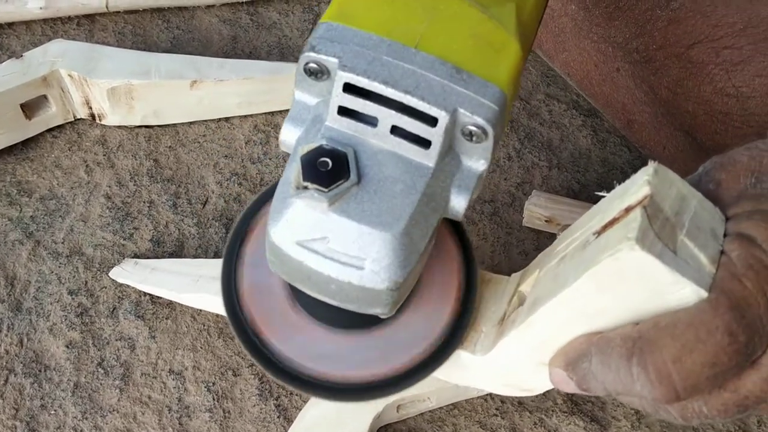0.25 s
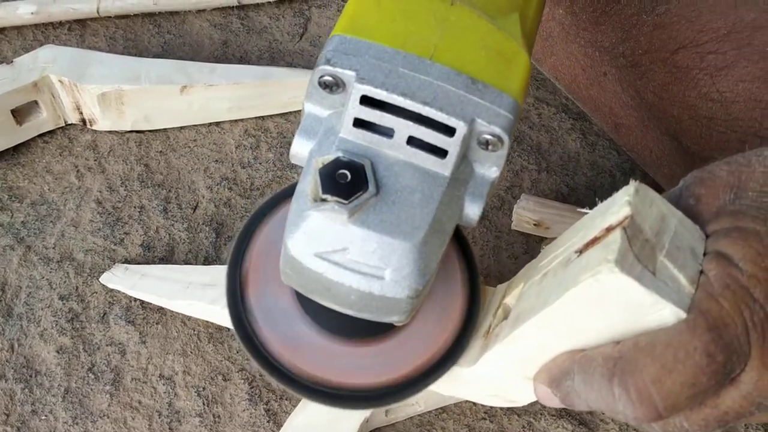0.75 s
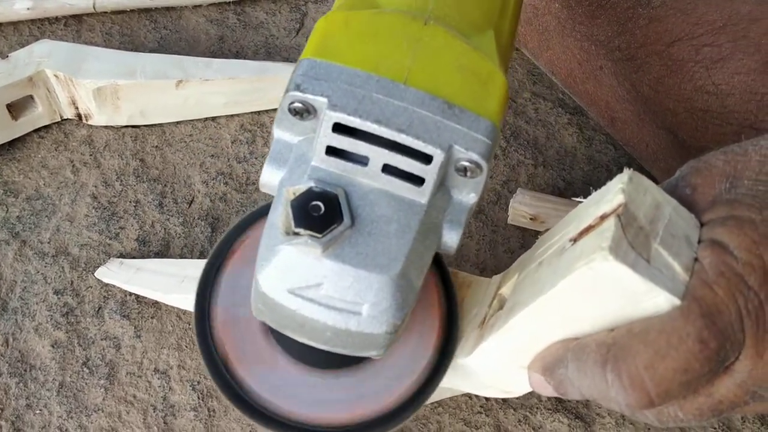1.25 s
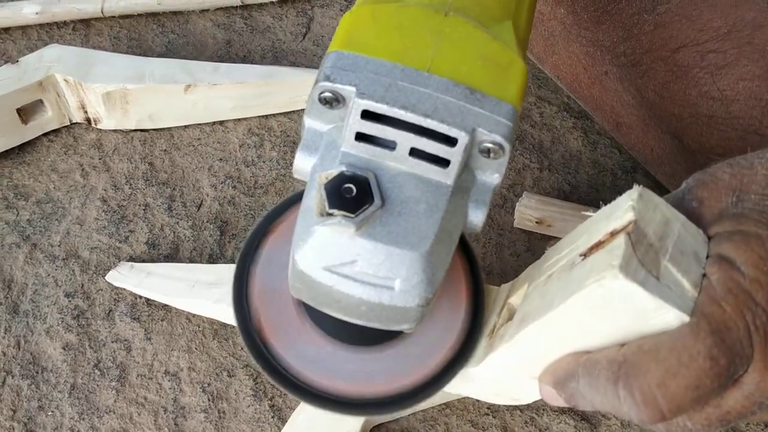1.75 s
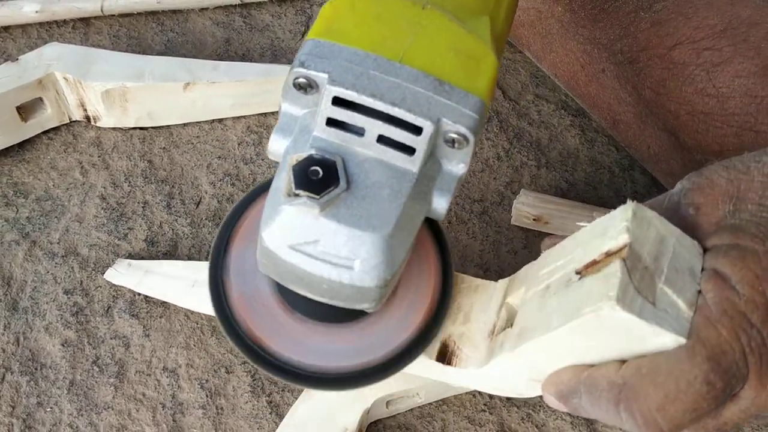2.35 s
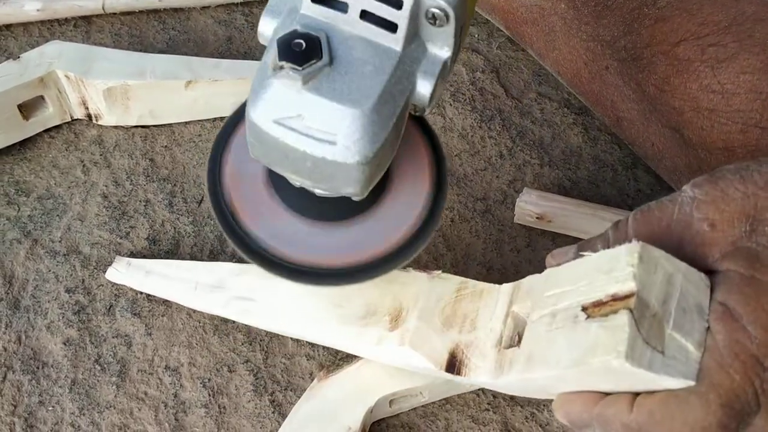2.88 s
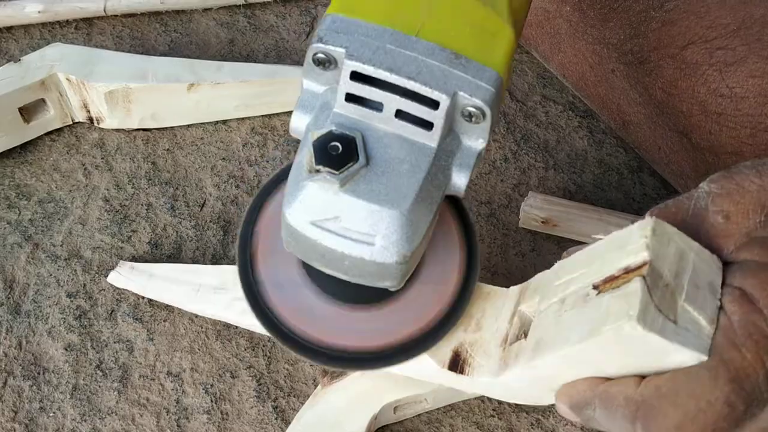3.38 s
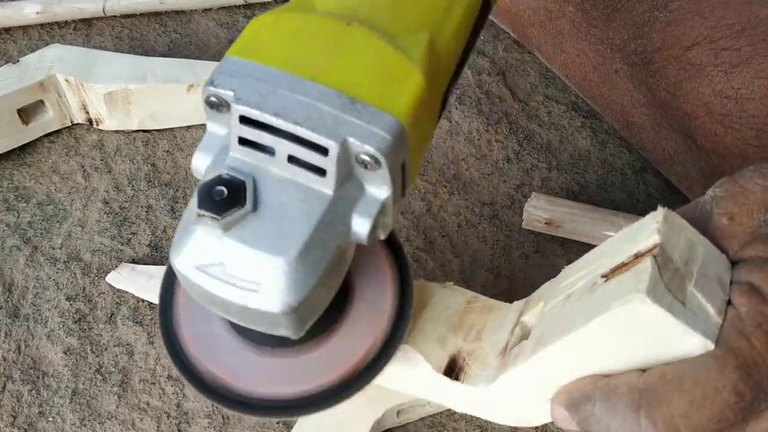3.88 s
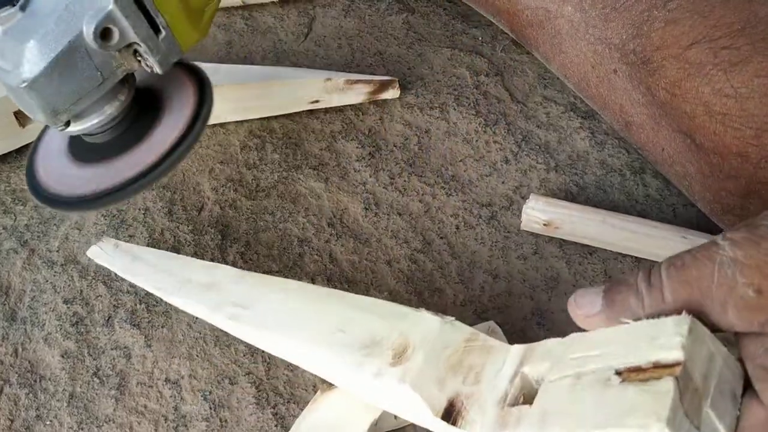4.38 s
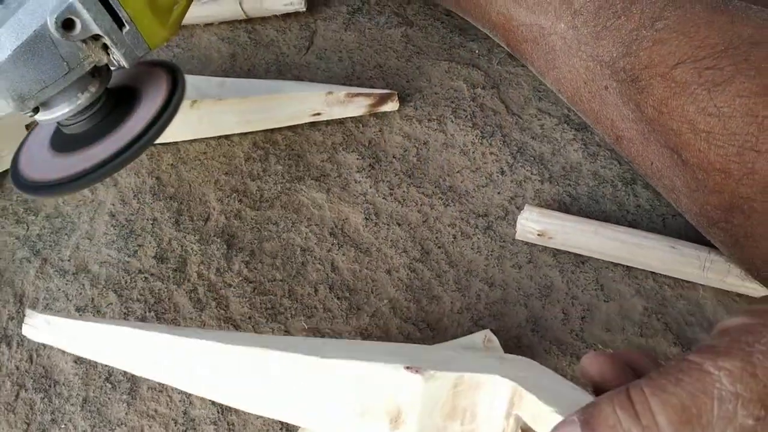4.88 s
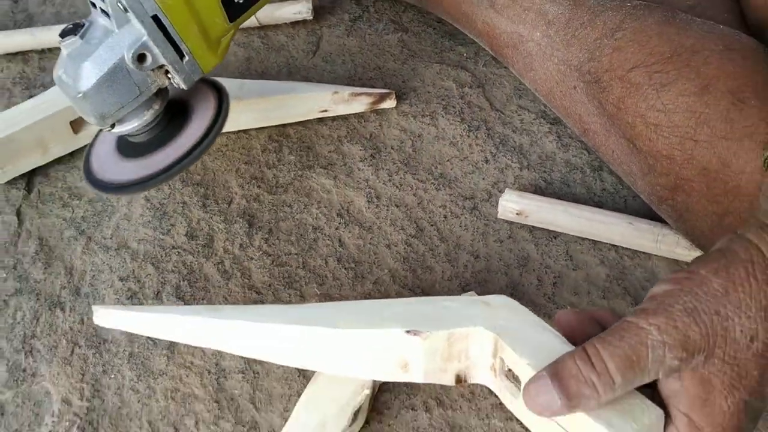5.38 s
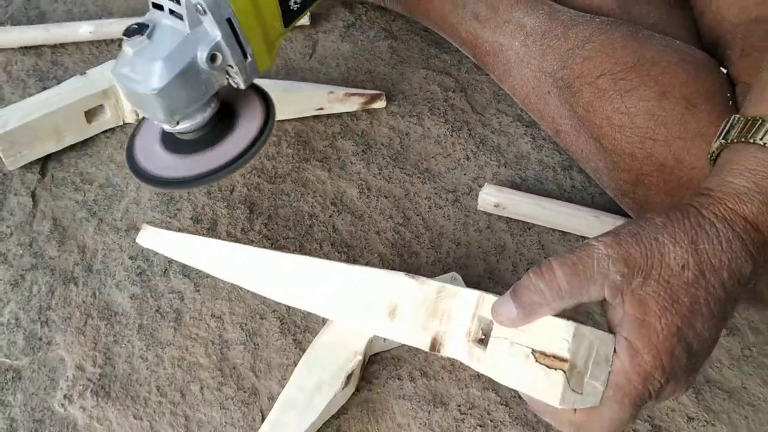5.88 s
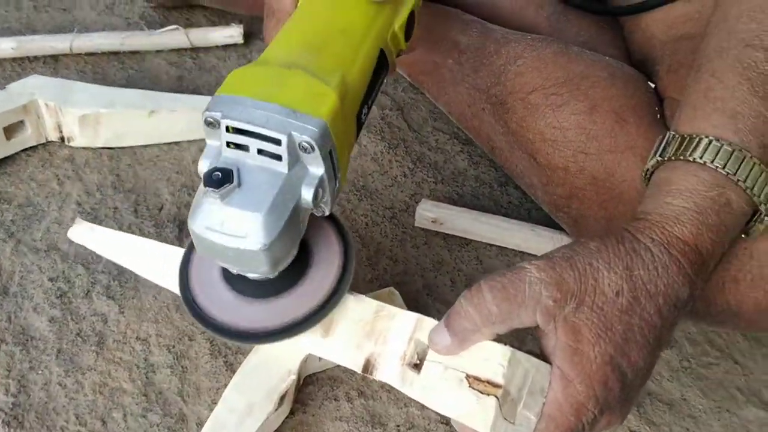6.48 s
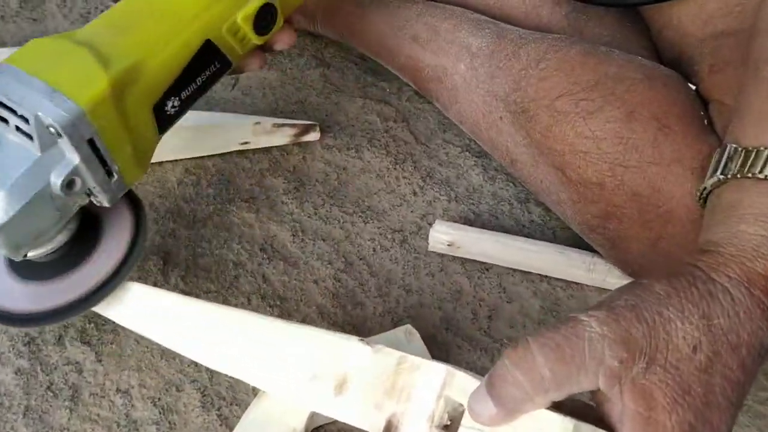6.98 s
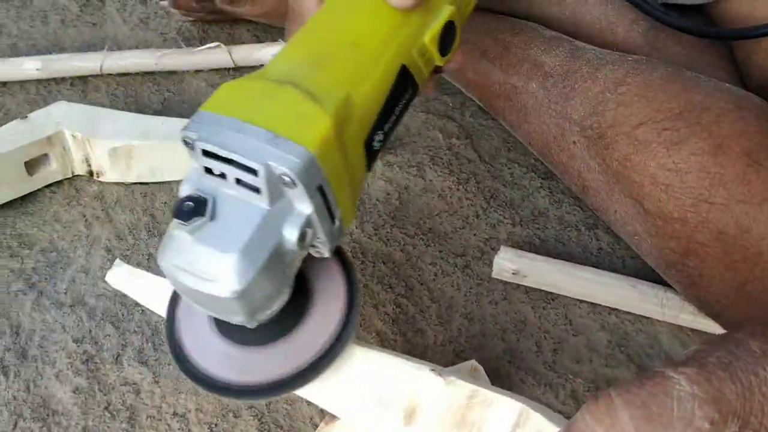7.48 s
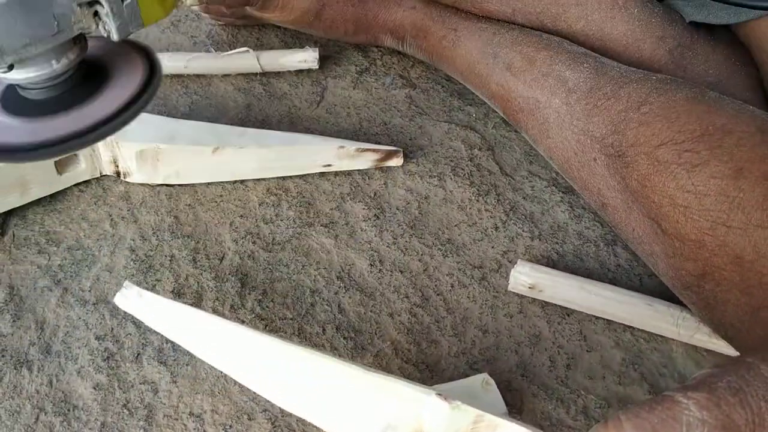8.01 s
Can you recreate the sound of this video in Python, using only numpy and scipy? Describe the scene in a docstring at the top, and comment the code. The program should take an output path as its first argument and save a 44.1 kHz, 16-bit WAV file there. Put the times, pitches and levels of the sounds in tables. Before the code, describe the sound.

Constant harsh fan rush and gear whine from a close power tool. Gritty sanding and squealing fill the first two seconds while the motor labours; release lets the pitch climb. A short scrape follows, then steady free spinning with a couple of sharp ticks, a longer lighter rasp on a slender piece of wood, and free spinning to the end. Faint crackle throughout, close surfaces, no roomy echo.

```python
"""A hand-held angle grinder with a sanding disc smooths a piece of wood, close by.
It starts pressed on the flat: the motor is slowed, the wood shades the fan air, and the grit, coming round
on every turn, makes a bright buzzing rasp with squeals and a few dull bumps. Lifted off, it speeds up,
briefly brushes the flat, runs free with two sharp ticks, works the thin tip, then runs free again.
Throughout, the fan rushes (shaped noise), motor and gears whine (shaft-locked tones) and ticks crackle."""
import sys
import numpy as np
from scipy import signal
from scipy.fft import rfft, irfft
from scipy.io import wavfile
from scipy.ndimage import uniform_filter1d, map_coordinates

SR = 44100
rng = np.random.default_rng(int(sys.argv[2]) if len(sys.argv) > 2 else 0)


def generate_wav(signal):
    """Clip the signal to [-1, 1] and save it as 16-bit WAV at the path in sys.argv[1]."""
    frames = np.transpose(np.atleast_2d(signal))
    scaled = np.clip(frames, -1, 1) * 32767
    pcm = np.round(scaled).astype(np.int16)
    wavfile.write(sys.argv[1], SR, pcm)


N = 363825
TIME = np.arange(N) / SR
BIN_HZ = np.maximum(np.arange(N // 2 + 1) * SR / N, 1)


def from_db(db):
    """Decibels to gain."""
    return np.exp(np.asarray(db) * (np.log(10) / 20))


def rms_one(x):
    """Scale to unit power."""
    return x / np.sqrt(np.mean(x ** 2) + 1e-20)


def in_time(rows):
    """Each column of a curve at every sample."""
    s, *columns = np.transpose(rows)
    return [np.interp(TIME, s, column) for column in columns]


def over_hz(points):
    """A short spectrum at every frequency bin, interpolated over log frequency."""
    hz, value = np.transpose(points)
    return np.interp(np.log(BIN_HZ), np.log(hz), value)


def resonances(peaks):
    """Bell-shaped peaks and hollows, in dB at every frequency bin."""
    return sum(db / (1 + (2 * (BIN_HZ - hz) / width_hz) ** 2) for hz, width_hz, db in peaks)


def above(edge_hz):
    """Gain of a smooth crossover that passes what lies above the edge."""
    return 1 / (1 + (edge_hz / BIN_HZ) ** 40)


def white():
    """The spectrum of a fresh white noise."""
    return rng.standard_normal(len(BIN_HZ)) + 1j * rng.standard_normal(len(BIN_HZ))


def drift(rate_hz):
    """Slow random curve of spread 1, changing about rate_hz times a second."""
    slow = rng.standard_normal(N // 20)   # one point per 20 samples
    hz = np.arange(len(slow) // 2 + 1) * SR / N
    slow = irfft(rfft(slow) / (1 + (hz / rate_hz) ** 2), len(slow))
    return np.interp(np.arange(N) / 20, np.arange(len(slow)), rms_one(slow))


def narrow_noise(turns, width_hz):
    """A rough line: noise of unit power gathered round a moving pitch."""
    envelope = drift(width_hz) + 1j * drift(width_hz)
    return np.real(envelope * np.exp(2j * np.pi * turns))


def panned(x, pan_db):
    """Place a sound, left minus right in dB."""
    return x * from_db(np.array([[.5], [-.5]]) * pan_db)


def delayed(x, ms):
    """Read a sound later by a delay that may change."""
    return np.interp(np.abs(TIME - ms / 1000), TIME, x)


# disc laid on the wood: start_s, end_s (lift begins), lean_in_s, lift_off_s, pressure (0-1), place
STROKES = [(-.08, 2.224, 0.37, 0.11, 0.7, "flat"), (3.27, 3.54, 0.15, 0.071, 0.4, "flat"),
           (6.22, 7.26, 0.23, .22, 0.7, "tip")]


def contact(place):
    """Pressure of the disc on one part of the wood: it leans in, holds and lifts off."""
    pressure = 0
    for start_s, end_s, lean_in_s, lift_off_s, peak, where in STROKES:
        if where == place:
            lean = np.clip((TIME - start_s) / lean_in_s, 0, 1)
            lift = np.clip(1 - (TIME - end_s) / lift_off_s, 0, 1)
            pressure = pressure + peak * lean * lift
    return pressure


FLAT_RASP_DB, TIP_RASP_DB = -15.5, -20   # at pressure 1, before the bites
# colour of the rasp: freq_hz, density_db (per Hz)
RASP_COLOUR = [(150, -24), (700, -32), (1200, -35), (2400, -9.5), (3200, -5.5), (6500, -1), (7600, 0.5),
               (11500, -1), (12600, 0.5), (14000, -5), (15700, -21)]
# ringing of disc and wood, on the flat and at the tip: freq_hz, width_hz, gain_db
FLAT_RING = [(6670, 650, -3.5), (7140, 300, 3), (8160, 1200, 2), (11300, 1500, 4.5), (12450, 400, -3),
             (14000, 400, -9)]
TIP_RING = [(3540, 880, 7.5), (5600, 410, 5.5), (7000, 370, 2), (11500, 650, 7.5), (13200, 790, -11)]
# uneven rasp from the rim: freq_hz, left_minus_right_db
RASP_BALANCE = [(2400, -7), (3800, 4), (6500, -3.5), (8500, 4.5), (11500, 0.5), (13000, -2)]
# rasp power from tearing fibres, which never repeats: freq_hz, share (0-1)
FIBRE_SHARE = [(3000, .03), (6000, .14), (8000, .33), (11000, .5), (14000, .8)]
# grit bites harder or slips: middle_s, length_s, change_db
BITES = [(1.1, 0.45, 2), (1.62, 0.2, -1.5), (1.95, 0.2, 2), (2.143, 0.22, -3.5), (6.55, 0.16, -3),
         (6.78, 0.14, 3), (6.93, 0.08, -2), (7.15, 0.14, 2.5), (7.26, 0.1, -4)]


def rasp(disc_turns, flat, tip, memory_turns=14, grit_db=4.0, wobble=0.036, judder_db=0.75, size=256):
    """The rim's grit is read once a turn; touching grains change slowly, and torn fibres add a hiss."""
    shape = (int(TIME[-1] * 200), size)   # turns, points round the rim
    keep = np.exp(-1 / memory_turns)
    rim = signal.lfilter([1], [1, -keep], rng.standard_normal(shape), axis=0)
    rim = rim * from_db(grit_db * rng.standard_normal(size))
    place = (disc_turns + 100) * size   # skip 100 turns while the memory settles
    grit = rfft(rms_one(map_coordinates(rim.ravel(), [place], order=3, mode="wrap")))
    fibres = rfft(rng.standard_normal((2, N)))
    share = over_hz(FIBRE_SHARE)
    scratch = panned(np.sqrt(1 - share) * grit + np.sqrt(share) * fibres, over_hz(RASP_BALANCE))
    out = 0
    for pressure, level_db, ring in ((flat, FLAT_RASP_DB, FLAT_RING), (tip, TIP_RASP_DB, TIP_RING)):
        colour = from_db(over_hz(RASP_COLOUR) + resonances(ring))
        out = out + pressure * from_db(level_db) * rms_one(irfft(scratch * colour, N))
    bite_db = sum(db * np.exp(-(2 * (TIME - s) / length_s) ** 2) for s, length_s, db in BITES)
    runout = 1 + wobble * np.cos(2 * np.pi * disc_turns)   # the disc runs slightly out of true
    return out * runout * from_db(bite_db + judder_db * drift(28))


SQUEAL_FADE_S, SQUEAL_DB, SQUEAL_WIDTH_HZ = 0.13, -25.5, 110
# disc squeals on the wood: start_s, end_s (half gain at both), cycles_per_disc_turn, level_re_squeal_db
SQUEALS = [(.42, .86, 55, -2), (.95, 1.5, 73.8, 1.5), (1.86, 2.04, 74, 0), (6.45, 7.3, 72, -1)]


def squeal(disc_turns):
    """Rough lines that swell while the disc sticks and slips, their pitch locked to its speed."""
    out = 0
    for start_s, end_s, cycles, db in SQUEALS:
        swell = np.clip(np.minimum(TIME - start_s, end_s - TIME) / SQUEAL_FADE_S + .5, 0, 1)
        out = out + from_db(SQUEAL_DB + db) * swell * narrow_noise(cycles * disc_turns, SQUEAL_WIDTH_HZ)
    return out


def shaded(levels, flat, tip):
    """Level in dB of a part of the fan air as the wood comes in its way."""
    free_db, flat_db, tip_db = levels
    return free_db + flat * flat_db + tip * tip_db


# edges of rumble, drone, roar, rush, hiss and top hiss: low_hz, high_hz
AIR_EDGES_HZ = [(15, 300), (300, 900), (900, 2650), (2650, 7000), (7000, 12350), (12350, 17000)]
# the same six bands: free_db, flat_change_db, tip_change_db (at pressure 1), vent_swing_share
AIR_LEVELS = [(-49, -5.5, -3.5, 0.05), (-37, -4, -3, 0.06), (-26.5, -4, -4, 0.13), (-19, -3.5, -4, 0.59),
              (-19.5, -1.5, -1, 1.86), (-22.5, 1.5, 0.3, .5)]
# random swirl of the six bands: swirl_db
SWIRL_DB = (1.6, .6, .6, .45, .3, .45)
# colour of the air within each band: freq_hz, density_db (per Hz)
AIR_COLOUR = [(25, -36), (70, -17), (115, -23.5), (165, -17.5), (300, -15), (560, -9.5), (1000, -7),
              (1350, -3), (2500, -1), (3200, 1.5), (6000, 0.5), (7000, -1), (8300, 0), (11900, 0),
              (12500, -5), (14200, -5.5), (15700, -3.5)]
# peaks and hollows of the vents: freq_hz, width_hz, gain_db
VENTS = [(487, 34, -8.5), (650, 66, 3), (3340, 270, 2.5), (4000, 400, -0.5)]
# vents turn towards and away from the listener: time_s, swing_db (before each band's share)
VENT_SWING = [(0, 1.1), (.6, -2.7), (2.2, -1.8), (2.35, 1), (3.15, 0.8), (3.45, -0.8), (3.7, 0.5),
              (4.5, -0.26), (5, -0.9), (5.15, -0.1), (5.5, 0), (6.2, 0.3), (6.9, -1), (7.55, 0.55),
              (8.25, -0.4)]
# side balance of the air: freq_hz, left_minus_right_db
AIR_BALANCE = [(200, 2.5), (850, 1), (1700, 3), (2500, -0.5), (3300, -1), (4500, 1.5), (7000, 1.5),
               (9000, 2.5), (11500, 2.5), (13000, 2), (15000, -2.5)]
# left-right likeness of the air: freq_hz, likeness (0-1)
LIKENESS = [(100, 0.8), (500, 0.85), (800, 0.9), (1300, .9), (2200, 0.35), (3000, .65), (5000, 0.6),
            (9000, 0.55)]
# later arrival at the left side: time_s, lag_ms
LEFT_LAG = [(0, 0.12), (1.7, 0.1), (3.2, 0.092), (4.2, 0.19), (4.8, 0.23), (6.2, 0.1), (6.8, 0.17),
            (8.25, 0.21)]


def fan_air(motor_turns, flat, tip, flutter_db=0.75, chop=0.078):
    """Turbulence shaped by the vents, chopped once a motor turn; its common part reaches the right first."""
    alike = np.clip(over_hz(LIKENESS), 0, 1)
    source = irfft(white(), N)
    direct = rfft([delayed(source, in_time(LEFT_LAG)[0]), source])
    air = np.sqrt(alike) * direct + np.sqrt(1 - alike) * np.array([white(), white()])
    air = panned(air * from_db(over_hz(AIR_COLOUR) + resonances(VENTS)), over_hz(AIR_BALANCE))
    swing_db, = in_time(VENT_SWING)
    out = 0
    for (low_hz, high_hz), (*levels, share), swirl_db in zip(AIR_EDGES_HZ, AIR_LEVELS, SWIRL_DB):
        band = rms_one(irfft(air * (above(low_hz) - above(high_hz)), N))
        level_db = shaded(levels, flat, tip) + share * swing_db + swirl_db * drift(20)
        out = out + band * from_db(level_db)
    return out * from_db(flutter_db * drift(21)) * (1 + chop * np.cos(2 * np.pi * motor_turns))


def air_colour(curve, level_db, width_hz, pan_db):
    """A narrow band of air noise, drawn afresh for each side, whose centre glides."""
    cycles = np.cumsum(in_time(curve)[0]) / SR
    sides = np.array([narrow_noise(cycles, width_hz) for side in range(2)])
    return panned(from_db(level_db) * sides, pan_db)


# narrow air colours that glide as the tool is moved about: time_s, centre_hz
LOW_COLOUR = [(3.7, 1376), (4.2, 1663), (5.3, 1751), (6.25, 1428), (7.5, 1250)]
HIGH_COLOUR = [(3.9, 5700), (5.1, 4830), (5.8, 4520), (7, 3436), (8.25, 3084)]
# their levels: free_db, flat_change_db, tip_change_db (at pressure 1)
LOW_COLOUR_LEVEL = (-35.5, -1.6, -24)
HIGH_COLOUR_LEVEL = (-31, 1.9, -8)
JET_PAN_DB_PER_MS, JET_CENTRE_LAG_MS, JET_DEFLECT_DB = -1, 0.081, -2.5


def fan_jet(motor_turns, disc_turns, flat, tip, disc_chop=0.061):
    """All broad fan air: it pans as the tool moves aside, and the flat of the wood throws it right."""
    air = fan_air(motor_turns, flat, tip)
    low_db = shaded(LOW_COLOUR_LEVEL, flat, tip)
    high_db = shaded(HIGH_COLOUR_LEVEL, flat, tip)
    air = air + air_colour(LOW_COLOUR, low_db, width_hz=165, pan_db=8.5)
    air = air + air_colour(HIGH_COLOUR, high_db, width_hz=930, pan_db=4)
    pan_db = JET_PAN_DB_PER_MS * (in_time(LEFT_LAG)[0] - JET_CENTRE_LAG_MS) + JET_DEFLECT_DB * flat
    stir = 1 + disc_chop * np.cos(2 * np.pi * disc_turns)   # the disc stirs the jet once a turn
    return panned(air, pan_db) * stir


def tone(turns, level_db, waver_db=1.3):
    """One wavering line locked to a shaft."""
    gain = np.sqrt(2) * from_db(level_db + waver_db * drift(23))
    return gain * np.sin(2 * np.pi * (turns + rng.random()))


# armature, bearing and fan tones: multiple_of_motor_speed, free_db, loaded_db (before the housing)
MOTOR_TONES = [(.78, -53, -60), (1, -42.5, -53.5), (2, -52.5, -57), (3, -48.5, -45), (4, -44.5, -62),
               (5, -41, -67), (12, -41, -53)]
# disc tones: multiple_of_disc_speed, free_db, loaded_db (before the housing)
DISC_TONES = [(2.012, -59, -72), (2.99, -52.5, -56.5), (4, -53.5, -48), (5, -44, -51.5), (7.02, -52, -45),
              (7.96, -50, -42.5), (9, -47, -44), (9.98, -56, -47), (11.95, -58, -52), (12.95, -49, -46),
              (14.64, -61, -39), (19.34, -51, -39), (29, -60, -37)]
# gear housing resonances; a tone swells as it glides through one: freq_hz, width_hz, gain_db
HOUSING = [(641, 52, 13.5), (1091, 20, 6), (1185, 84, 4.5), (1710, 44, 7)]
FAN_BLADES = 30
HUM_FREE_DB, HUM_LOADED_DB = -51.5, -59.5   # the unbalanced disc hums once a turn
WHISTLE_FREE_DB, WHISTLE_LOADED_DB = -27.5, -37.5


def whine(motor_turns, disc_turns, load):
    """Lines of both shafts, coloured by the housing, plus the blade whistle; load changes each level."""
    out = tone(disc_turns, HUM_FREE_DB + load * (HUM_LOADED_DB - HUM_FREE_DB))
    for turns, table in ((motor_turns, MOTOR_TONES), (disc_turns, DISC_TONES)):
        for multiple, free_db, loaded_db in table:
            out = out + tone(multiple * turns, free_db + load * (loaded_db - free_db))
    out = irfft(rfft(out) * from_db(resonances(HOUSING)), N)
    whistle_db = WHISTLE_FREE_DB + load * (WHISTLE_LOADED_DB - WHISTLE_FREE_DB)
    whistle = tone(FAN_BLADES * motor_turns, whistle_db, waver_db=1.0)
    return panned(out, pan_db=1.5) + panned(whistle, pan_db=-12 * load)


def blade_hiss(motor_turns, level_db=-34, width_hz=260, pan_db=-9):
    """Turbulence on the fan blades spreads a skirt round their whistle."""
    return panned(from_db(level_db) * narrow_noise(FAN_BLADES * motor_turns, width_hz), pan_db)


# wood bumps on the ground: start_s, level_db
BUMPS = [(0.191, -26.5), (1.02, -38), (1.925, -39.5), (2.08, -36.5), (2.115, -40)]
# modes of the wood: freq_hz, level_db, t60_s
WOOD = [(214, 5.5, 0.053), (247, -6, 0.052), (119.3, -5, 0.087)]
# sharp ticks from the running tool: start_s, level_db (before the high-pass)
TICKS = [(3.775, -7), (4.124, -7.5), (6.872, -14), (6.904, -12), (7.35, -14)]


def knocks(tick_t60_s=0.019):
    """Dull bumps of the workpiece (decaying modes) and short bright ticks (decaying noise)."""
    out = np.zeros((2, N))
    age = TIME[:SR // 5]
    bump = sum(from_db(db - 60 * age / t60_s) * np.sin(2 * np.pi * hz * age) for hz, db, t60_s in WOOD)
    bump = bump * (1 - np.exp(-age / 0.0045))   # soft contact
    for start_s, db in BUMPS:
        first = int(start_s * SR)
        out[:, first:first + len(age)] += from_db(db) * bump
    bright = signal.butter(2, 4000, "high", fs=SR, output="sos")
    for start_s, db in TICKS:
        first = int(start_s * SR)
        crack = rng.standard_normal((2, len(age))) * from_db(db - 60 * age / tick_t60_s)
        out[:, first:first + len(age)] += signal.sosfilt(bright, crack)
    return out


def crackle(per_s=14, level_db=-21, t60_s=0.0054):
    """Faint random ticks of brush sparks and flying dust: short bursts of high-passed noise."""
    born = rng.random(N) < per_s / SR
    sizes = born * from_db(level_db + 2 * np.minimum(rng.exponential(1, N), 3))
    bursts = signal.lfilter([1], [1, -from_db(-60 / (t60_s * SR))], sizes + 1e-18)
    bright = signal.butter(2, 5000, "high", fs=SR, output="sos")
    return signal.sosfilt(bright, bursts * rng.standard_normal((2, N)))


# reflections from the ground, the wood and the hands: delay_ms, level_db
ECHOES = [(0.701, -27.5), (1.15, -26), (2.8, -12)]
SWAY_MS, SWAY_PER_S = .025, .8


def surroundings(x, from_hz=2200):
    """Small near surfaces throw back the treble; as the tool sways their peaks and hollows shift."""
    treble = irfft(rfft(x) / (1 + (from_hz / BIN_HZ) ** 4), N)
    heard = treble.copy()
    for delay_ms, db in ECHOES:
        path_ms = delay_ms + SWAY_MS * drift(SWAY_PER_S)
        heard += from_db(db) * np.array([delayed(side, path_ms) for side in treble])
    return x - treble + heard * np.std(treble) / np.std(heard)   # treble power unchanged


SLIP_RAD = 1.7


def shifting_treble(x, from_hz=3300, order=512, size=5, count=41):
    """Random patches of treble slip in and out of step between the sides: a wide, shifting timbre."""
    hz, _, frames = signal.stft(x, SR, nperseg=order)
    patches = rng.standard_normal(frames.shape[1:])
    for _ in range(2):
        patches = uniform_filter1d(patches, size, axis=0)
        patches = uniform_filter1d(patches, count, axis=1)
    treble = (hz ** 4 / (hz ** 4 + from_hz ** 4))[:, None]
    slip = SLIP_RAD * rms_one(patches) * treble
    return signal.istft(frames * np.exp(.5j * np.array([slip, -slip])), SR, nperseg=order)[1][:, :N]


# narrow bands whose middle thins out and comes back, leaving a wide sound:
# time_s, centre_hz, width_hz, depth (0-1)
LOW_THINNING = [(0, 3000, 200, .45), (2.2, 2980, 200, .3), (2.45, 3020, 260, .9), (2.8, 3000, 240, .85),
                (3.1, 3000, 220, .35), (3.8, 3000, 250, .35), (3.95, 3050, 380, .92),
                (4.33, 3000, 280, .85), (4.5, 2970, 300, .4), (5.2, 2900, 400, .6), (5.45, 2880, 480, .96),
                (5.8, 2920, 420, .94), (5.97, 2950, 350, .35), (6.13, 2880, 400, .92),
                (6.3, 2880, 400, .92), (6.5, 2850, 350, .55), (6.75, 2450, 300, .65),
                (6.95, 2330, 300, .45), (7.08, 2380, 380, .95), (7.17, 2650, 300, .55),
                (7.24, 2850, 420, .92), (7.5, 3200, 300, .65), (7.7, 3000, 300, .25)]
MIDDLE_THINNING = [(0, 4620, 350, .7), (.7, 4720, 420, .8), (1.2, 4550, 300, .35), (1.85, 4680, 350, .65),
                   (2.3, 4700, 350, .35), (2.6, 4550, 400, .65), (3.6, 4600, 400, .25),
                   (4.2, 3730, 400, .05), (5.65, 3650, 500, .55), (6.05, 3900, 400, .1),
                   (6.44, 3600, 450, .45), (6.5, 3480, 850, .97), (6.62, 3900, 800, .97),
                   (6.68, 4100, 400, 0)]
HIGH_THINNING = [(0, 6270, 400, 0.2), (2.2, 6300, 400, 0.1), (2.55, 7000, 350, 0.65), (3.3, 7000, 400, .15),
                 (4.4, 6500, 600, 0.3), (6.2, 7400, 400, 0.35), (7.6, 7070, 400, 0.1), (7.9, 7000, 600, .5)]
THINNING_WANDER_HZ, THINNING_FLICKER = 45, .45


def thinned_middle(x, spread=0.13, order=1024):
    """Gliding bands are drained from the middle and slightly raised in the side signal."""
    middle_and_side = np.array([x[0] + x[1], x[0] - x[1]]) / 2
    hz, s, (mid, side) = signal.stft(middle_and_side, SR, nperseg=order)
    for curve in (LOW_THINNING, MIDDLE_THINNING, HIGH_THINNING):
        controls = (*in_time(curve), drift(12), drift(13))
        centre_hz, width_hz, depth, wander, waver = (np.interp(s, TIME, c) for c in controls)
        depth = np.clip(1 - (1 - depth) * np.exp(THINNING_FLICKER * waver), 0, 1)
        offset_hz = hz[:, None] - centre_hz - THINNING_WANDER_HZ * wander
        drained = depth / (1 + (2 * offset_hz / width_hz) ** 8)
        mid = mid * (1 - drained)
        side = side * (1 + spread * drained)
    return signal.istft(np.array([mid + side, mid - side]), SR, nperseg=order)[1][:, :N]


# motor speed before smoothing: time_s, turns_per_s
SPEED = [(0, 533), (.3, 521.5), (.85, 486.5), (1.1, 479.2), (1.47, 488.8), (1.72, 488.2), (2.03, 480.5),
         (2.25, 491), (2.62, 526), (2.95, 541), (3.22, 545.7), (3.65, 540.5), (4.4, 550.3), (5.4, 553.4),
         (6.25, 553.6), (6.78, 535.3), (7.5, 543), (8.25, 550.2)]
GEAR_RATIO = 11 / 36   # disc turns per motor turn
TIP_WHINE_DB = -5.5   # at pressure 1; tilted on to the tip, the housing faces away


def scene(unsteady=0.000684, flat_load=1.0, tip_load=0.07):
    """One motor speed drives fan, gears and disc; pressure on the wood sets rasp, load and shading."""
    speed = uniform_filter1d(in_time(SPEED)[0], size=5000, mode="nearest")
    flat, tip = contact("flat"), contact("tip")
    motor_turns = np.cumsum(speed * (1 + unsteady * drift(18.5))) / SR
    disc_turns = GEAR_RATIO * motor_turns
    air = fan_jet(motor_turns, disc_turns, flat, tip)
    sanding = rasp(disc_turns, flat, tip) + squeal(disc_turns)
    load = flat_load * flat + tip_load * tip
    tones = whine(motor_turns, disc_turns, load) * from_db(TIP_WHINE_DB * tip)
    heard = shifting_treble(surroundings(air + sanding + tones + blade_hiss(motor_turns)))
    return thinned_middle(heard) + knocks() + crackle()


LOW_CUT_HZ, CUTOFF_HZ = 217, 15780


def record(dry):
    """The microphone drops the deep bass; the top is cut steeply."""
    low_cut = signal.butter(3, LOW_CUT_HZ, "high", fs=SR, output="sos")
    top_cut = signal.ellip(14, .1, 100, CUTOFF_HZ, fs=SR, output="sos")
    return signal.sosfilt(top_cut, signal.sosfilt(low_cut, dry))


dry = scene()
out = record(dry)
generate_wav(out)
```